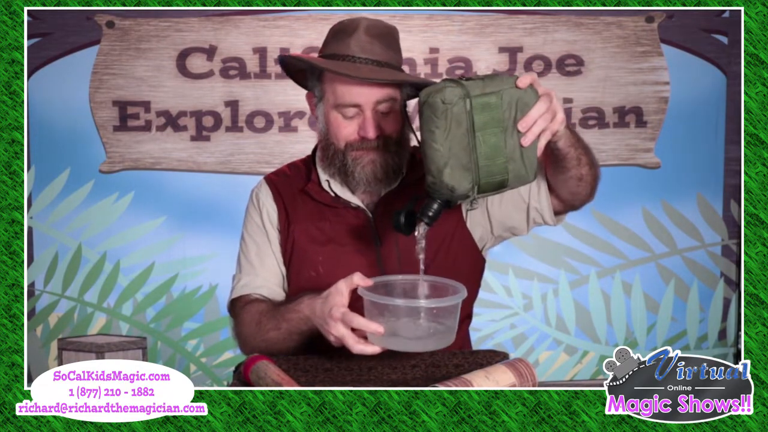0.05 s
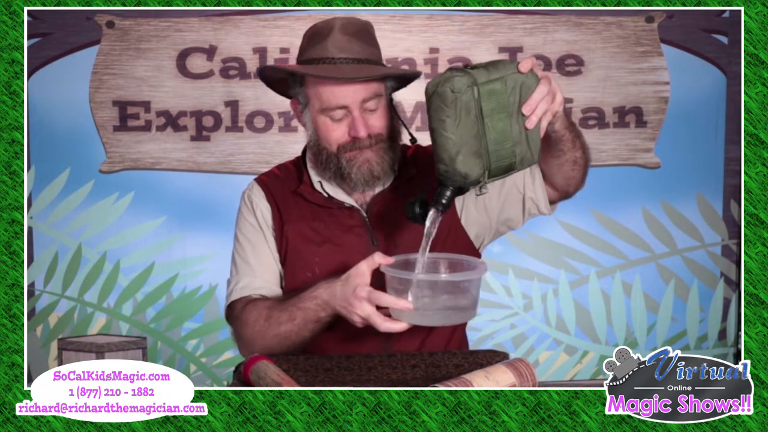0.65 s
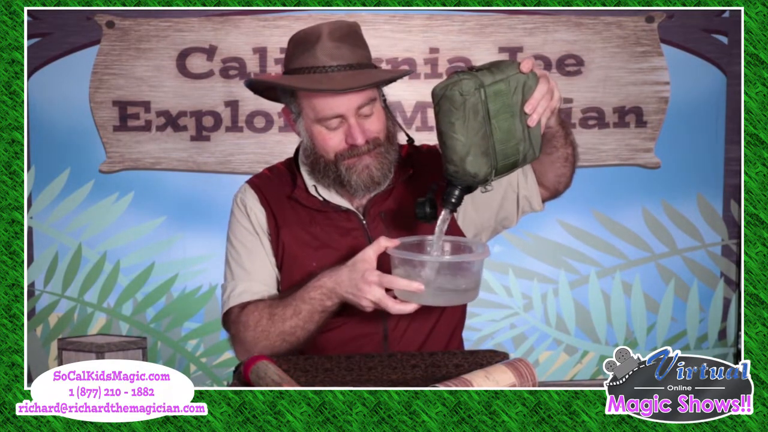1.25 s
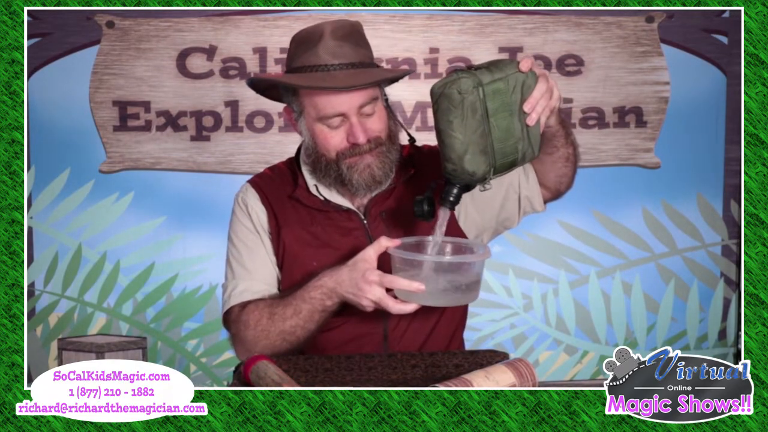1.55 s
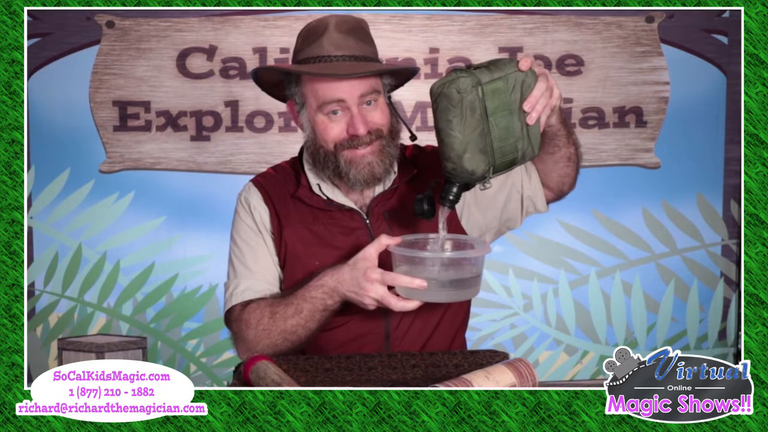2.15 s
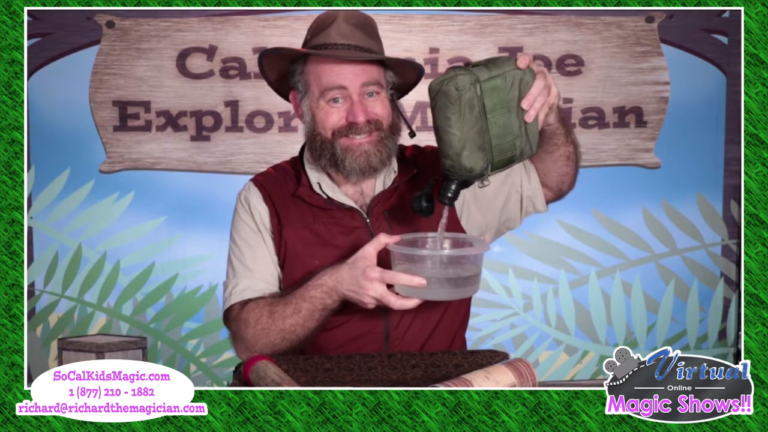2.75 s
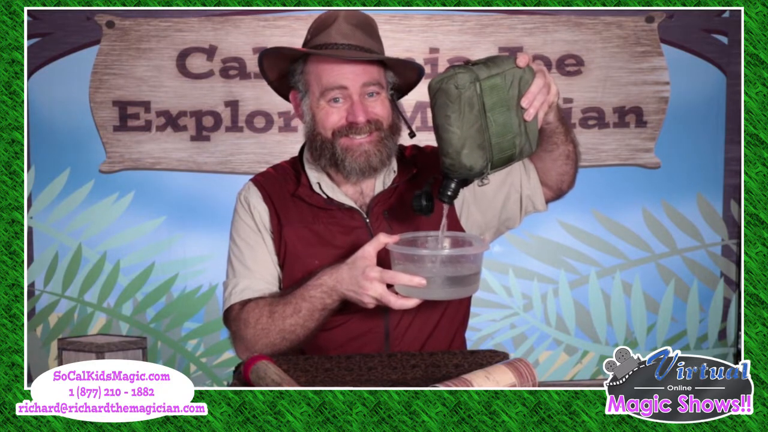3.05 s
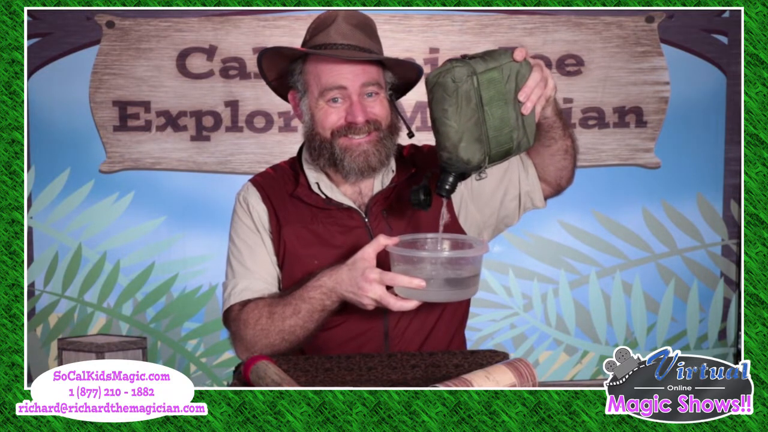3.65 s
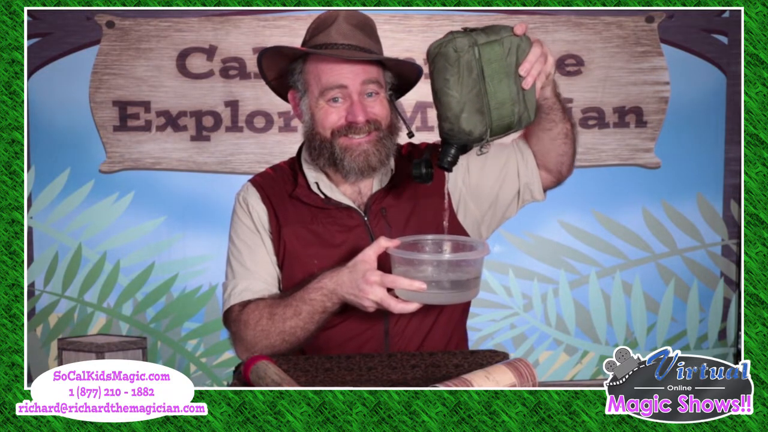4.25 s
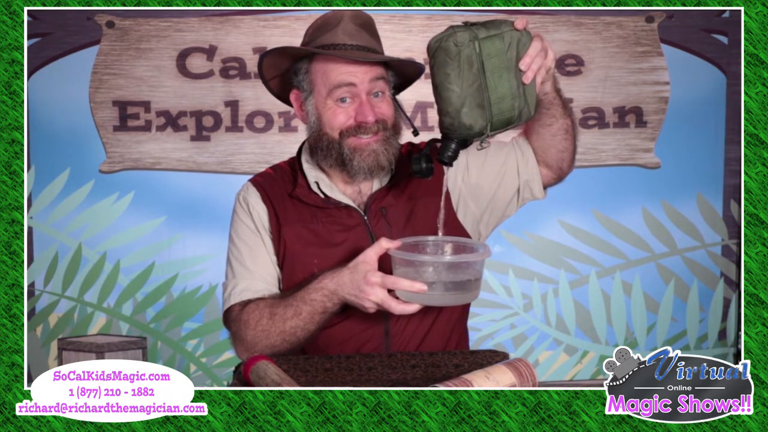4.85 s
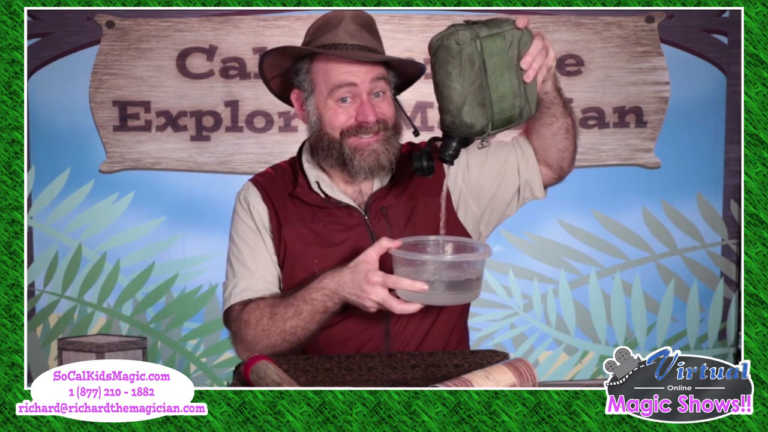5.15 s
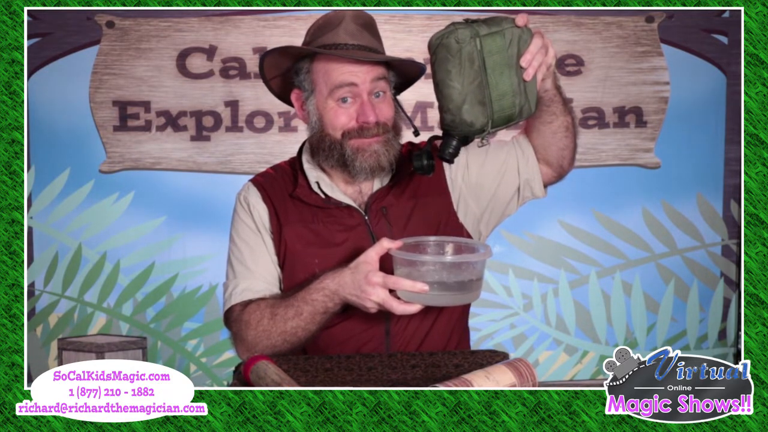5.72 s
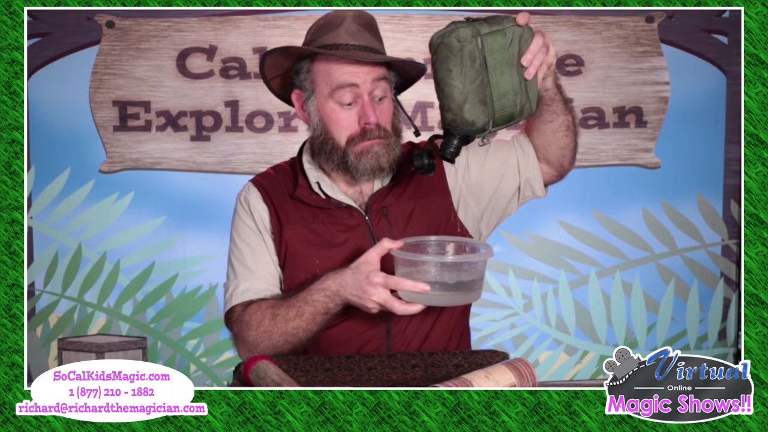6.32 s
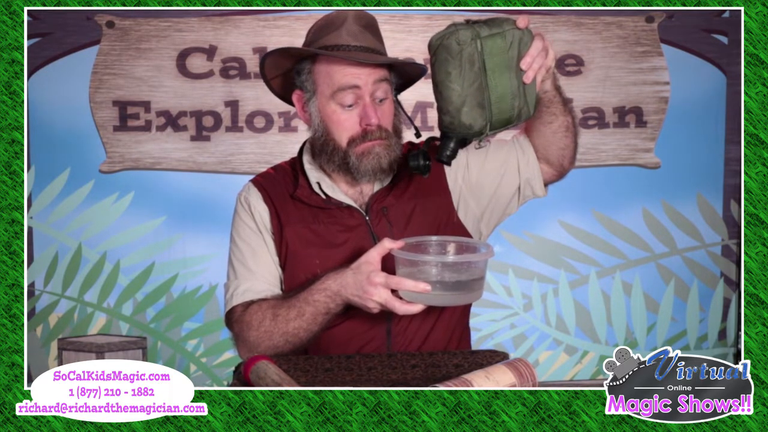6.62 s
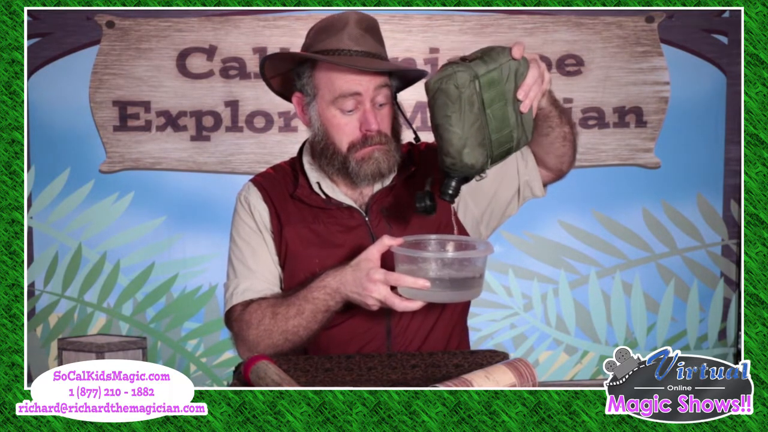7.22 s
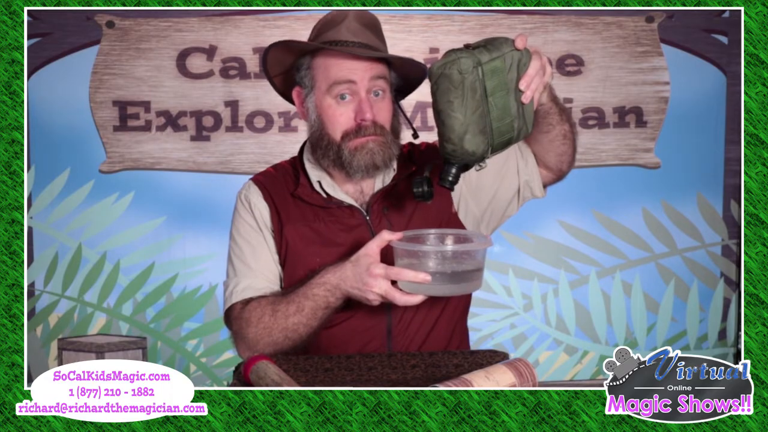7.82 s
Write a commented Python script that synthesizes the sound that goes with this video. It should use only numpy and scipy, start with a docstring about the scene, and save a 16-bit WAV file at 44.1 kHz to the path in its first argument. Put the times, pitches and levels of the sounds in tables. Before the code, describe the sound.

A thin stream of water splashes and gurgles into a plastic bowl, then tapers to a few single drips.

```python
"""Canteen poured into a plastic bowl

A thin stream runs from a canteen into a hand-held bowl, close to the microphone on the left.
It patters on the nearly bare bottom, then plunges into deepening water, trapping bubbles that
ring and mostly bend upward, and finally breaks into single drips. The room is small and dry,
with a low rumble that swells as the hands shift; the right channel carries only hiss."""
import sys
import numpy as np
from scipy import signal
from scipy.fft import rfft, irfft, next_fast_len
from scipy.io import wavfile
from scipy.ndimage import uniform_filter1d

SR = 44100
rng = np.random.default_rng(int(sys.argv[2]) if len(sys.argv) > 2 else 0)


def waveform_to_disk(signal):
    """Save audio, clipped to [-1, 1], as 16-bit WAV at the path in sys.argv[1]."""
    frames = np.transpose(np.atleast_2d(signal))
    scaled = np.clip(frames, -1, 1) * 32767
    samples = np.round(scaled).astype(np.int16)
    wavfile.write(sys.argv[1], SR, samples)


N = 347508

# strength of the stream where it lands (time [s], level [dB])
STREAM_LEVEL = [(0, -54), (0.22, -59.5), (0.33, -42.5), (0.75, -45), (1.18, -49), (1.55, -43), (1.9, -44.5),
                (2.15, -50), (2.7, -45.5), (3.05, -48), (3.35, -47.5), (3.8, -48), (4.3, -52),
                (4.75, -50.5), (5.0, -42.5), (5.3, -44), (5.75, -53), (6.3, -55), (6.8, -63.5)]
# the canteen gulps and throws a heavier splash (time [s], level [dB], half length [s])
GULPS = [(.885, -40.5, 0.021), (.96, -34.5, 0.017), (1.365, -41.5, 0.032)]
# bubbling of the air that the stream drags under (time [s], level [dB])
CHURN_LEVEL = [(0.15, -63), (0.35, -50.5), (0.55, -54), (1.4, -50), (2.0, -50), (3.0, -47), (3.75, -47.5),
               (4.2, -81), (4.7, -80), (4.9, -45.5), (5.4, -60), (5.7, -73)]
# large air pockets (time [s], level [dB], pitch [Hz], life [s], rise over one life [octaves])
PLOPS = [(0.104, -43, 1310, 0.006, -0.067), (0.347, -29.5, 804, 0.0078, -0.13),
         (0.81, -32, 700, 0.0073, 0.14), (.901, -22, 1660, 0.0023, 0.059), (1.066, -25, 584, 0.0025, 0.19),
         (1.715, -25.5, 930, 0.0044, .02), (1.752, -28.5, 1015, 0.004, 0.039),
         (1.814, -28, 750, 0.0027, -0.035), (2.125, -27, 857, 0.0076, 0.11),
         (2.32, -30.5, 803, 0.016, 0.12), (2.405, -28, 840, 0.0059, 0.023),
         (2.464, -21.5, 797, 0.0076, -0.014), (2.723, -29, 823, 0.0083, 0.011),
         (2.772, -25.5, 1035, 0.0043, 0.06), (2.883, -30.5, 780, 0.016, 0.11),
         (2.946, -21.5, 820, 0.0045, -0.065), (3.16, -28, 730, 0.0082, 0.075),
         (3.225, -32, 692, 0.0078, -0.023), (3.555, -29.5, 814, 0.014, 0.065),
         (3.577, -27.5, 775, 0.0084, -0.054), (3.779, -32.5, 714, .01, -.02),
         (3.891, -30.5, 886, 0.0065, -0.083), (3.924, -22, 699, 0.019, 0.21), (3.963, -30, 595, 0.02, 0.41),
         (3.991, -21.5, 695, 0.015, 0.24), (4.074, -36.5, 862, 0.022, 0.1),
         (4.253, -35, 1525, 0.0067, 0.0007), (4.36, -47.5, 814, 0.051, 0.42),
         (4.401, -41, 980, 0.017, 0.45), (4.499, -25, 1482, 0.0083, -0.023),
         (4.532, -25.5, 828, 0.028, 0.15), (4.561, -26.5, 736, 0.018, 0.28),
         (4.601, -29.5, 893, 0.014, 0.16), (4.778, -30.5, 1000, 0.009, 0.32),
         (4.836, -33.5, 830, 0.013, 0.025), (4.981, -26.5, 578, 0.016, 0.45),
         (5.005, -25.5, 862, 0.0082, 0.037), (5.025, -30.5, 778, 0.016, 0.26),
         (5.194, -24, 887, 0.0047, 0.21), (5.272, -28, 1650, 0.0043, 0.054),
         (5.292, -32.5, 660, 0.014, -0.076), (5.388, -34, 765, 0.016, 0.097),
         (5.498, -26, 630, 0.0045, -0.063), (5.536, -36.5, 664, 0.022, 0.45),
         (5.557, -34.5, 561, 0.039, 0.64), (5.611, -26.5, 1010, 0.0028, 0.036),
         (5.765, -32, 1530, 0.0075, 0.18), (5.886, -36.5, 1040, 0.0093, 0.41),
         (5.989, -29, 1170, 0.006, -0.27), (5.995, -29.5, 825, 0.021, -0.034),
         (6.544, -34.5, 805, 0.0076, 0.18), (7.469, -41, 918, 0.02, 0.063),
         (7.686, -43, 1550, 0.011, -0.012)]
# tiny bubbles that ping above the splashing (time [s], level [dB], pitch [Hz])
PING_BUBBLES = [(0.336, -27, 2660), (0.345, -24.5, 5450), (0.4738, -24.5, 6630), (.5424, -19.5, 6850),
                (1.488, -28.5, 3900), (1.647, -20.5, 2810), (1.664, -24, 2660), (1.9864, -26.5, 4250),
                (2.523, -22, 4250), (2.6733, -32, 3800), (3.1785, -23.5, 4290), (3.6175, -22, 9600),
                (3.8368, -22.5, 5770), (4.167, -20, 13500), (4.772, -24, 6770), (5.0268, -21.5, 5400),
                (5.1265, -24, 4040), (5.293, -31, 4480), (5.3881, -10.5, 6180), (6.708, -41, 2250),
                (7.395, -20, 5280)]
# big drops that smack and ring (time [s], level [dB], ring pitch [Hz], ring against the level [dB])
RINGING_DROPS = [(0.206, -36.5, 11400, -12), (0.9423, -24, 6500, -12), (1.054, -26.5, 4000, -18),
                 (1.283, -20, 11000, -15.5), (1.7985, -35.5, 11200, 1.5), (1.835, -30.5, 4560, -8.5),
                 (2.0313, -25.5, 4700, -11), (2.361, -36.5, 6870, -6.5), (2.592, -28.5, 5870, -14.5),
                 (2.9197, -37.5, 4200, -5), (3.1392, -29.5, 5680, -9.5), (3.3029, -32.5, 6940, -8.5),
                 (3.5203, -37, 9700, -6), (3.7288, -33, 10600, -10), (3.981, -31.5, 8100, -7.5),
                 (4.1657, -28.5, 4170, -13), (4.3476, -29.5, 9010, -14.5), (4.4262, -31, 4200, -15),
                 (4.6838, -31, 6830, -10), (4.7591, -31, 4030, -11.5), (5.1947, -31, 5500, -12),
                 (5.4431, -23, 8300, -16.5), (5.6093, -28.5, 5480, -10.5), (5.882, -45.5, 4070, -0.5),
                 (5.9902, -37, 6000, -9), (6.3933, -39.5, 4720, -11), (7.3991, -38, 2650, -16)]
# lumps of the stream that land flat, with no ring (time [s], level [dB])
FLAT_DROPS = [(0.0358, -33.5), (0.174, -32), (0.2746, -31), (1.184, -39), (1.243, -34.5), (1.355, -30),
              (1.86, -36), (1.874, -32), (1.8935, -31), (1.962, -31.5), (2.1253, -26), (2.157, -28.5),
              (2.245, -28.5), (2.316, -29), (2.651, -30), (2.9333, -31), (3.335, -29.5), (3.365, -32.5),
              (3.392, -33), (3.89, -33), (4.499, -30.5), (4.6282, -29), (4.928, -33), (5.09, -29.5),
              (5.2808, -22), (5.351, -29.5), (5.7634, -35.5), (6.079, -34.5), (6.1347, -33.5),
              (6.204, -31.5)]
# colour of a splash on the bare bottom (frequency [Hz], gain [dB])
SHALLOW_EQ = [(100, -17), (250, -5.5), (650, 2.5), (1250, -19.5), (1600, -4.5), (2100, -8.5), (2750, -0.5),
              (3500, -9), (4200, -10.5), (5200, -7.5), (6500, -11.5), (7600, -9.5), (10500, -8.5),
              (15000, -16.5)]
# colour of a splash on deep water (frequency [Hz], gain [dB])
DEEP_EQ = [(150, -13), (500, -10.5), (850, 3.5), (1250, -8.5), (1600, 2), (2100, -15), (2750, 2.5),
           (3500, -11.5), (4200, 2), (5000, -1), (6500, 2.5), (7600, -2), (10500, 0), (15000, -9)]
# dull slap of water closing over an air pocket (frequency [Hz], gain [dB])
SLAP_EQ = [(150, -8.5), (600, 5.5), (1650, 7), (2100, -2.5), (12000, -9)]
# decay of the room (frequency [Hz], time to fall 60 dB [s])
ROOM_DECAY = [(1500, 0.14), (12000, 0.04)]
# the hands shift and the microphone rumbles (time [s], level [dB], half length [s])
HANDLING = [(.1, -45, 0.31), (1.2, -47, 0.22), (2.16, -37.5, 0.081), (2.495, -32, 0.018),
            (4.5, -51.5, 0.76), (7.83, -45, 0.23)]
# colour of the rumble (frequency [Hz], gain [dB])
RUMBLE_EQ = [(25, -0.5), (70, -4.5), (190, -19.5), (900, -47.5)]
# room and preamplifier hiss on the left (frequency [Hz], gain [dB])
LEFT_HISS_EQ = [(40, -35), (150, -13), (450, -14.5), (1000, -21.5), (2500, -27.5), (7000, -30),
                (15000, -31)]
# bare hiss on the right (frequency [Hz], gain [dB])
RIGHT_HISS_EQ = [(60, 5.5), (3000, -1)]
# bubble crowds, large and small (rate [1/s], centre pitch [Hz], pitch spread [octaves], life [s])
GURGLE_SHALLOW, GURGLE_DEEP = (200, 859, 0.36, 0.0026), (45, 862, 0.15, 0.0086)
PLIPS_SHALLOW, PLIPS_DEEP = (130, 1653, 0.18, 0.0051), (45, 1492, 0.19, 0.0055)

START_DEPTH, COVERED_S, FILL_S = 0.26, 1.85, 0.3  # the water covers the bottom, then deepens
DROPLETS_PER_S, THINNING_S = 950, 1.9  # the stream thins into ever fewer droplets
SINK_OCT_PER_S = 0.097  # the crowds sink in pitch as the bowl fills
FLICK_SHARE = 0.396  # share of a bubble's bend that comes as a last flick near the surface
SMACK_DB, SPRAY_DB, SLAP_DB = -15.5, -16, -24.5  # layers of a big drop, against its level
SPRAY_HZ, SPRAY_OCTAVES, SPRAY_DELAY_S = 6184, 0.699, 0.0015  # centre pitch, spread, onset scatter
RUMBLE_DB, ROOM_DB, TOP_HZ = -51, -15, 15750
TIME = np.arange(N) / SR


def spatter():
    """Droplets splat and spray, most in shallow water, over the sizzle of the unbroken stream."""
    s = arrivals(DROPLETS_PER_S * np.exp(-TIME / THINNING_S))
    size = amp(5.0 * np.minimum(rng.standard_normal(s.shape), 1.9))
    t = np.arange(SR // 160) / SR
    envelope = 0.46 * (1 - np.exp(-t / 0.00022)) * np.exp(-t / 0.00095)
    splats = envelope * rng.standard_normal((len(s), len(t)))
    lumps = wobble(N, depth_db=by_depth(2.5, 5, TIME), span=0.0074)  # the stream lands unevenly
    sprays = by_depth(0.74, 0.46, s) * spray(len(s), t, count=2)
    patter = steadied(in_bowl(lumps * placed(s, size * (splats + sprays))), span=0.083)
    sizzle = unit(in_bowl(lumps * rng.standard_normal(N)))
    sizzle_share = by_depth(0.13, 0.15, TIME)
    level = fader(STREAM_LEVEL) + swells(GULPS)
    return level * (np.sqrt(1 - sizzle_share) * patter + np.sqrt(sizzle_share) * sizzle)


def plops():
    """Large air pockets ring out; the short-lived ones are born with a harder wet slap."""
    s, db, hz, life, rise = columns(PLOPS)
    t = np.arange(SR // 10) / SR
    flutter = wobble((len(s), len(t)), depth_db=1.5, span=0.005)  # churning water shakes each ring
    rings = amp(db) * bubble(t, hz, life, rise, attack=0.00077) * flutter
    slaps = amp(db - 3 - 670 * life) * np.exp(-t / 0.004) * rng.standard_normal(rings.shape)
    return placed(s, rings) + coloured(placed(s, slaps), SLAP_EQ)


def churn():
    """Air dragged under gurgles as large bubbles and plips as smaller ones."""
    plips = amp(by_depth(-2.5, -11, TIME)) * crowd(PLIPS_SHALLOW, PLIPS_DEEP)
    gurgle = crowd(GURGLE_SHALLOW, GURGLE_DEEP)
    return fader(CHURN_LEVEL) * (gurgle + plips)


def crowd(shallow, deep):
    """Many bubbles around one pitch; they get fewer, lower and longer as the bowl fills."""
    s = arrivals(by_depth(shallow[0], deep[0], TIME))
    _, centre_hz, octaves, life = (by_depth(a, b, s) for a, b in zip(shallow, deep))
    centre_hz = centre_hz * 2 ** (-SINK_OCT_PER_S * np.maximum(s - COVERED_S, 0))
    detune, stretch, weight, bend = rng.standard_normal((len(s), 4)).T[:, :, None]
    t = np.arange(SR // 20) / SR
    hz = centre_hz * 2 ** (octaves * detune)
    rings = bubble(t, hz, life * np.exp(0.34 * stretch), rise=0.042 + 0.026 * bend, attack=0.0002)
    slaps = 0.26 * np.exp(-t / 0.0019) * rng.standard_normal(rings.shape)
    size = amp(4.5 * np.minimum(weight, 1.5))
    return steadied(placed(s, size * rings) + coloured(placed(s, size * slaps), SLAP_EQ), span=0.4)


def drops():
    """Every big drop smacks the water; some also set one bright bubble ringing."""
    s, db, hz, ring_db = columns(RINGING_DROPS)
    t = np.arange(SR // 50) / SR
    rings = np.array([unit(bubble(t, f, life=7 / f, rise=0.018, attack=0.0001)) for f in hz])
    flat = smacks(*columns(FLAT_DROPS))
    return flat + smacks(s, db) + placed(s + 0.0005, amp(db + ring_db) * rings)


def smacks(s, db):
    """A drop hits with a sharp crack, a dull slap under it and a spray on top."""
    lead_s = 0.005  # room for the crack to build
    t = np.arange(SR // 50) / SR
    from_peak = t - lead_s
    spike = np.exp(-np.abs(from_peak) / 0.000052)
    body = 2.5 * np.exp(-np.maximum(from_peak / 0.0016, -from_peak / 0.0014))
    cracks = np.array([noise(DEEP_EQ, len(t), envelope=spike + body) for _ in s])
    slaps = np.array([noise(SLAP_EQ, len(t), envelope=np.exp(-t / 0.0043)) for _ in s])
    sprays = np.array([unit(cluster) for cluster in spray(len(s), t, count=4)])
    splashes = amp(db) * (amp(SPRAY_DB) * sprays + amp(SLAP_DB) * slaps)
    return placed(s - lead_s + 0.000995, amp(db + SMACK_DB) * cracks) + placed(s, splashes)


def pings():
    """Tiny bubbles swell and ring for a few cycles."""
    s, db, hz = columns(PING_BUBBLES)
    t = np.arange(SR // 60) / SR
    return placed(s, amp(db) * bubble(t, hz, life=8.6 / hz, rise=0.017, attack=1.36 / hz))


def spray(droplets, t, count):
    """Each droplet leaves a quick cluster of tiny bubbles, the higher ones louder and shorter."""
    detune, weight, delay = rng.standard_normal((droplets, 3, count)).transpose(1, 2, 0)[..., None]
    hz = np.clip(SPRAY_HZ * 2 ** (SPRAY_OCTAVES * detune), 1300, TOP_HZ)
    cycles = hz * np.maximum(t - np.abs(delay) * SPRAY_DELAY_S, 0)
    gain = amp(1.8 * weight) * (hz / SPRAY_HZ) ** 0.47
    envelope = (1 - np.exp(-cycles)) * np.exp(-(cycles / 5.3) ** 0.76)
    return np.sum(gain * envelope * np.sin(2 * np.pi * cycles), axis=0)


def bubble(t, hz, life, rise, attack):
    """A ringing air pocket; with positive rise it climbs as it floats up and flicks at the surface."""
    age = np.minimum(t / life, 6)
    octaves = rise * ((1 - FLICK_SHARE) * age + FLICK_SHARE * np.minimum(age, 2.5) ** 3)
    pitch = hz * 2 ** np.minimum(octaves, 1)
    envelope = (1 - np.exp(-t / attack)) * np.exp(-age ** 1.58)
    return envelope * np.sin(2 * np.pi * np.cumsum(pitch, axis=-1) / SR)


def in_bowl(x):
    """Splashes crossfade from the bare-bottom colour to the brighter one of deep water."""
    return by_depth(unit(coloured(x, SHALLOW_EQ)), unit(coloured(x, DEEP_EQ)), TIME)


def by_depth(shallow, deep, s):
    """Morph from the shallow value to the deep one as the bowl fills, at the times s."""
    depth = 1 - (1 - START_DEPTH) * np.exp(-np.maximum(s - COVERED_S, 0) / FILL_S)
    return shallow + (deep - shallow) * depth


def room(x):
    """The small room answers after 5 ms with a short tail whose treble dies first."""
    hz, t, spectrum = signal.stft(rng.standard_normal(SR // 3), SR, nperseg=256)
    decay = amp(-60 * t / along(ROOM_DECAY, hz)[:, None])
    tail = signal.istft(spectrum * decay, SR, nperseg=256)[1]
    return signal.fftconvolve(x, np.pad(tail, (SR // 200, 0)) / np.linalg.norm(tail))[:N]


def rumble():
    """A steady low bed from the room, swelling as the hands shift."""
    return np.hypot(amp(RUMBLE_DB), swells(HANDLING)) * noise(RUMBLE_EQ)


def noise(eq, length=N, envelope=1):
    """Noise shaped by an envelope, then an EQ, at rms 1."""
    return unit(coloured(envelope * rng.standard_normal(length), eq))


def coloured(x, eq):
    """Minimum-phase EQ through (Hz, dB) points, so hits keep their attack."""
    m = 2 * next_fast_len(len(x) // 2 + 2048)
    cepstrum = irfft(np.log(amp(along(eq, np.fft.rfftfreq(m, 1 / SR)))))
    cepstrum[1:m // 2] *= 2
    cepstrum[m // 2 + 1:] = 0
    return irfft(rfft(x, m) * np.exp(rfft(cepstrum)))[:len(x)]


def along(points, hz):
    """Read (Hz, value) points on a log axis."""
    f, values = np.transpose(points)
    return np.interp(np.log(hz + 1), np.log(f), values)


def fader(points):
    """Gain ride through (s, dB) points."""
    return amp(np.interp(TIME, *np.transpose(points)))


def swells(rows):
    """Gain ride made of bell-shaped swells."""
    return sum(amp(db) * np.exp(-((TIME - s) / width) ** 2) for s, db, width in rows)


def wobble(shape, depth_db, span):
    """A random gain that changes over span seconds."""
    size = int(span * SR)
    drift = uniform_filter1d(uniform_filter1d(rng.standard_normal(shape), size), size // 2)
    return amp(depth_db * unit(drift))


def steadied(x, span):
    """Level the rms toward 1 over span seconds, keeping the grain."""
    size = int(span * SR)
    power = np.abs(uniform_filter1d(uniform_filter1d(x ** 2, size), size))
    return x / np.sqrt(power + np.mean(power) / 20)


def arrivals(rate):
    """Irregular trigger times that follow a rate per second."""
    due = np.cumsum(np.maximum(rate, 1)) / SR
    turns = np.arange(int(due[-1]))
    return np.interp(turns + rng.uniform(-1, 1, len(turns)), due, TIME)[:, None]


def placed(times, waves):
    """Lay each row of waves on the timeline at its time."""
    index = np.round(np.reshape(times, (-1, 1)) * SR).astype(int) + np.arange(waves.shape[1])
    return np.bincount(np.maximum(index, 0).ravel(), waves.ravel(), N)[:N]


def columns(cues):
    """Split a cue list into columns, one row per event."""
    return np.transpose(cues)[:, :, None]


def amp(db):
    """Decibels to gain."""
    return 10 ** (np.asarray(db) / 20)


def unit(x):
    """Scale to rms 1."""
    return x / np.sqrt(np.mean(x ** 2) + 1e-20)


def scene():
    """Water, rumble and room tone on the left; bare hiss on the right."""
    water = plops() + pings() + drops() + churn() + spatter()
    left = water + rumble() + amp(ROOM_DB) * room(water) + amp(-54) * noise(LEFT_HISS_EQ)
    return np.array([left, amp(-59) * noise(RIGHT_HISS_EQ)])


def record(dry):
    """A brick-wall low-pass cuts everything above TOP_HZ."""
    m = next_fast_len(N + SR // 2)
    return irfft(rfft(dry, m) * (np.fft.rfftfreq(m, 1 / SR) < TOP_HZ), m)[:, :N]


dry = scene()
out = record(dry)
waveform_to_disk(out)
```